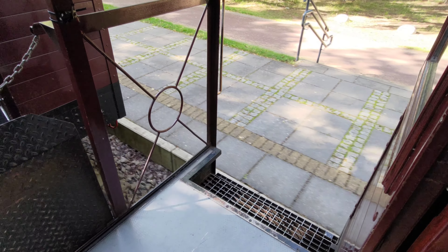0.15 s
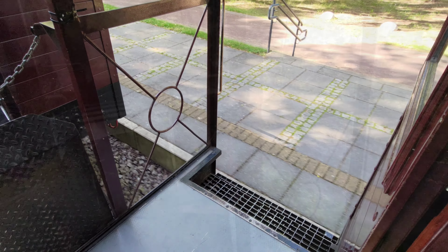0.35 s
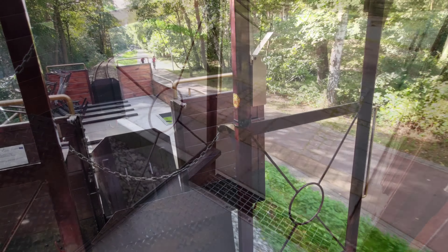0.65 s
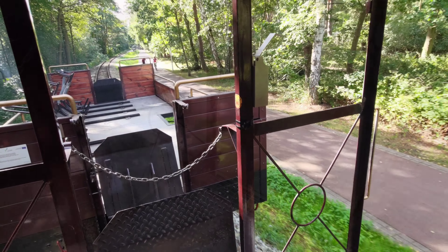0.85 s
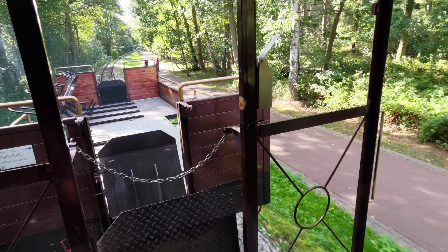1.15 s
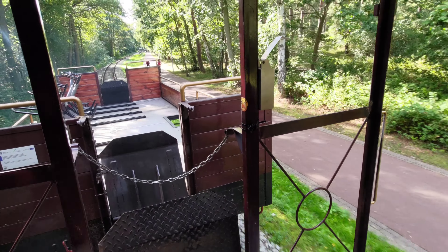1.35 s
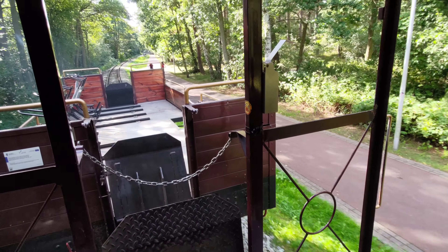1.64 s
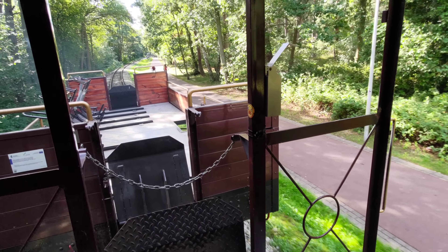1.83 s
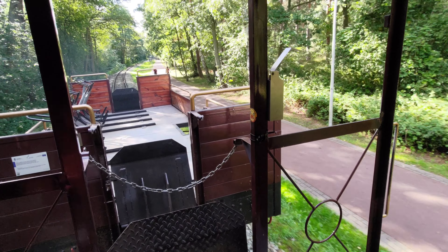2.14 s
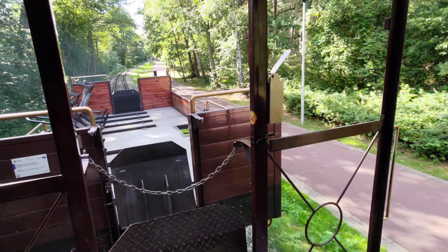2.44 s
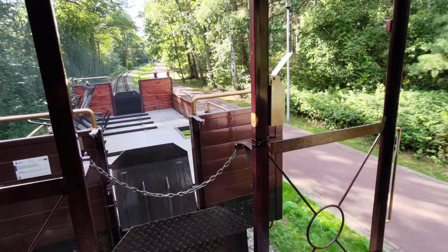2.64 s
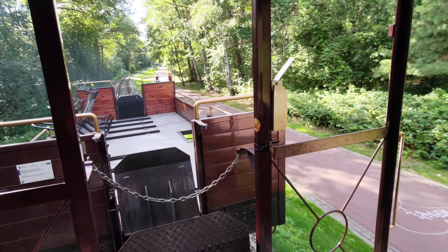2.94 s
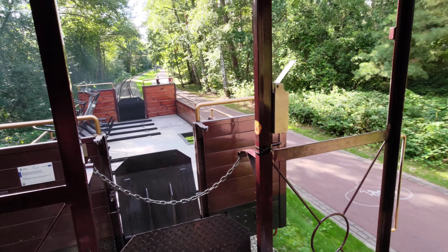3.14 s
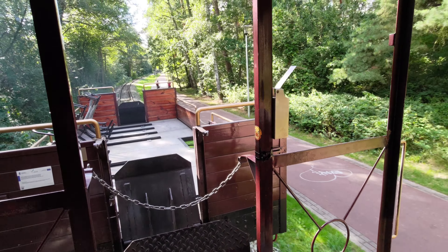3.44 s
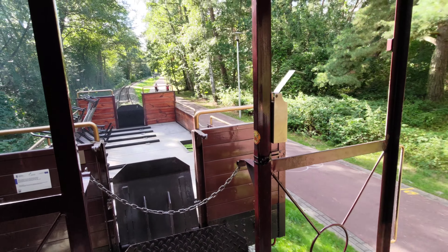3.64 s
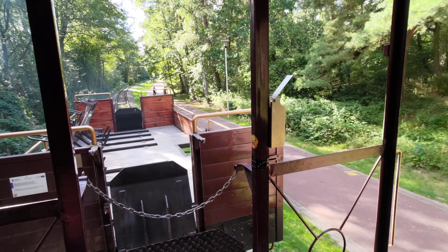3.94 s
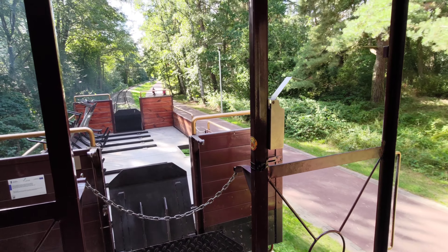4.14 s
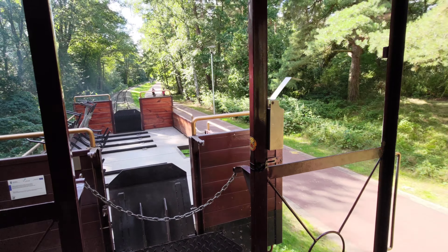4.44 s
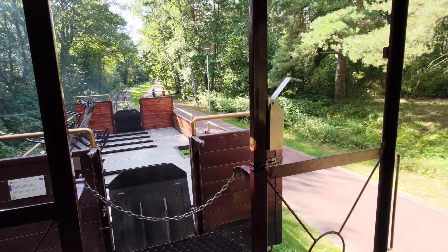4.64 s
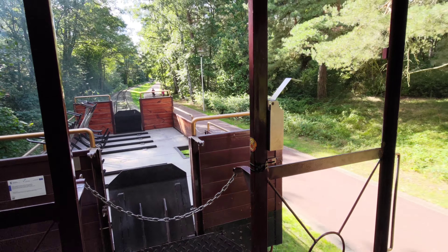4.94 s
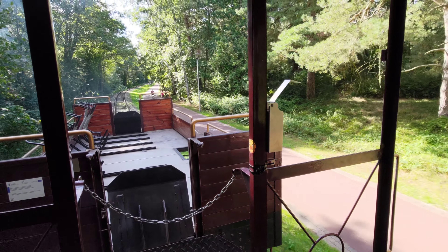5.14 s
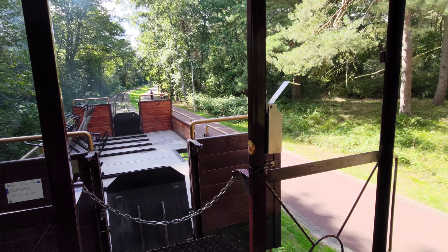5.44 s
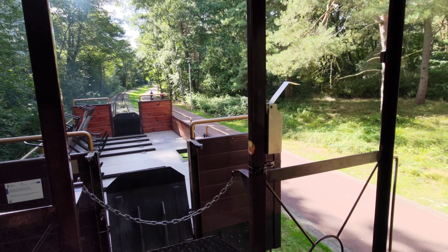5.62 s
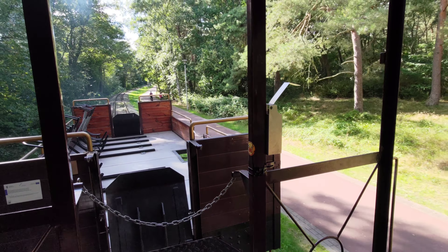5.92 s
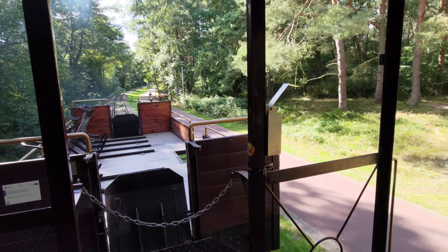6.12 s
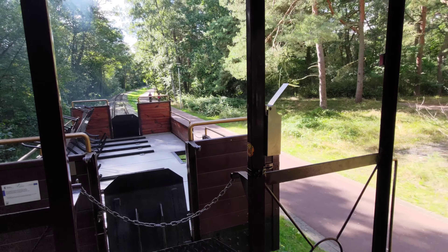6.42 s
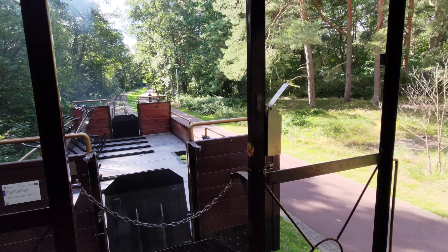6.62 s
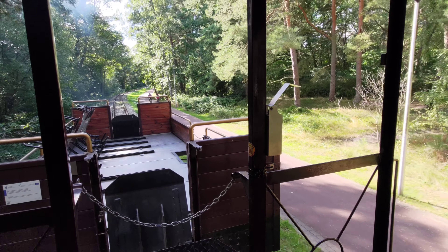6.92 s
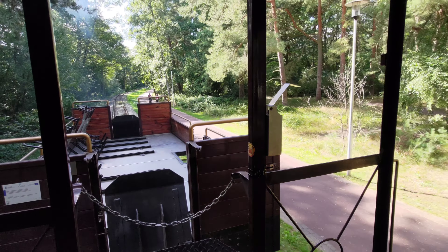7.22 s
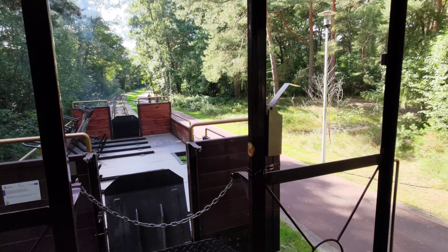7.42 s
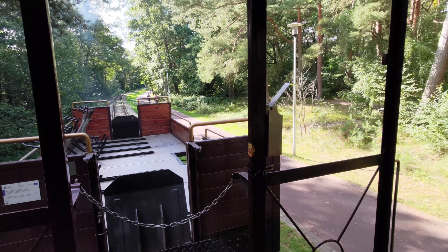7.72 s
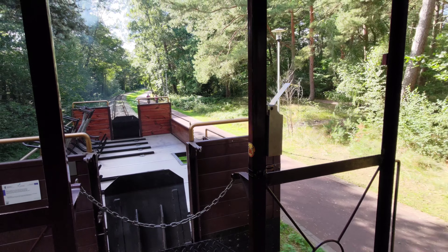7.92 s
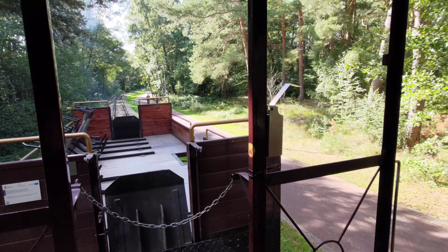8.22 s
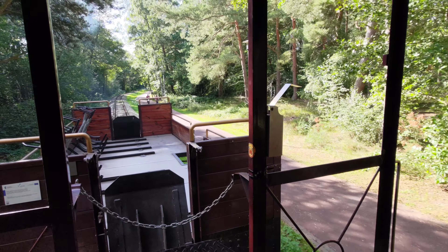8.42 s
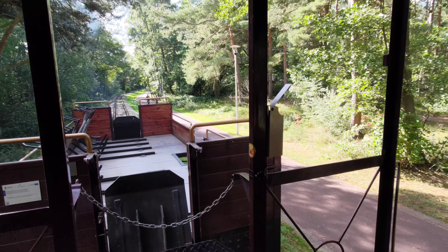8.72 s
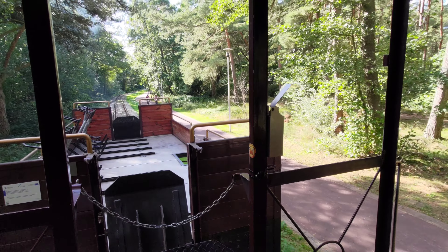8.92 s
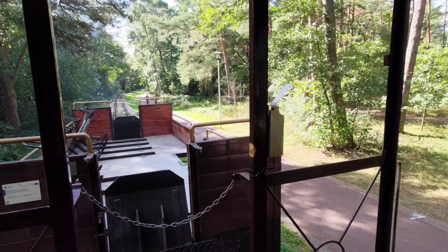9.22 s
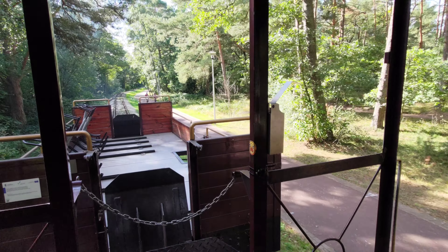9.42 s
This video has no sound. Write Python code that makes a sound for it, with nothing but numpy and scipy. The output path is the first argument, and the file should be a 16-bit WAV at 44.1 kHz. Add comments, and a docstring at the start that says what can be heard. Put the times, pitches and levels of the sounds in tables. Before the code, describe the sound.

A small open railway carriage rolls steadily with a deep boom and drumming boards, a short hiss and soft thump recurring each wheel turn.

```python
"""A low wooden boom and drumming with a ring of steel wheels: an open carriage of a small railway rolls
through woodland, heard from its platform. Shaped noise gives the body, wheels and rolling hiss. Once each
wheel turn something rubs with a short hiss of friction noise and thumps the body in a few soft cycles.
A thin squeal of two close partials sounds near the start; now and then the coupling knocks, as dying modes.
"""
import sys
import numpy as np
from scipy import signal
from scipy.io import wavfile
from scipy.ndimage import uniform_filter1d

SR = 44100
rng = np.random.default_rng(int(sys.argv[2]) if len(sys.argv) > 2 else 0)


def generate_wav(signal):
    """Clip the signal to [-1, 1] and save it as 16-bit WAV at the path in sys.argv[1]."""
    frames = np.transpose(np.atleast_2d(signal))
    scaled = np.clip(frames, -1, 1) * 32767
    pcm = np.round(scaled).astype(np.int16)
    wavfile.write(sys.argv[1], SR, pcm)


N = 421596  # length [samples]

# layer levels before the swells: (time [s], boom of the body [dB], drumming of the floor [dB],
# drumming of the side boards [dB], rolling hiss [dB], ring of the wheels [dB])
RIDE_LEVELS = [(0.0, -21.5, -27.5, -32, -41, -45), (0.2, -20, -26, -24.5, -35, -37.5),
               (0.3, -23, -36.5, -32.5, -48, -52), (0.55, -23.5, -27, -28.5, -42.5, -46),
               (1.01, -20.5, -24.5, -21.5, -40.5, -43.5), (1.97, -19, -24, -20.5, -40, -39),
               (2.61, -21, -29, -23, -43.5, -43.5), (3.3, -20, -27, -23, -43, -45.5),
               (4.1, -21.5, -27.5, -25, -44, -48.5), (4.8, -22, -23.5, -25.5, -43.5, -45),
               (5.4, -20, -26.5, -24.5, -44.5, -44.5), (6.3, -21, -25.5, -26.5, -44.5, -49),
               (7.2, -22.5, -25.5, -24, -43.5, -48.5), (8.0, -20, -25.5, -24.5, -44.5, -46),
               (8.7, -21, -25, -24.5, -44.5, -47), (9.56, -22.5, -23.5, -25, -44, -45.5)]
# swell of each of those layers once a wheel turn: (depth [dB], lag behind the rub [share of a turn])
TURN_SWELLS = [(1, 0.13), (0.5, 0.19), (1, .05), (0.3, 0.34), (1.5, 0.27)]
# the swells change as the train gathers speed: (time [s], factor on the depth [ratio])
SWELL_GROWTH = [(0, .5), (4.0, .7), (4.6, 1), (7.0, 1.36), (9.56, 1.1)]
# relative noise spectra of body, floor, side boards, rolling and rub: (frequency [Hz], density [dB per Hz])
BOOM_SPECTRUM = [(12, -45), (20, -27), (32, -15), (42, -9), (52, -4), (66, 0), (80, -3), (96, -1),
                 (125, -8), (150, -20), (400, -90)]
FLOOR_SPECTRUM = [(60, -62), (100, -29), (140, 4), (172, 10), (202, 1.5), (240, -1.5), (320, -69),
                  (900, -90)]
BOARD_SPECTRUM = [(90, -64), (170, -16.5), (235, -2), (290, -0.5), (335, -7), (500, -18), (660, -22.5),
                  (800, -29), (1000, -41), (1400, -74), (3000, -92)]
ROLL_SPECTRUM = [(500, 11.5), (900, 8.5), (1350, 9.5), (2000, 3), (2900, 0), (4200, -1.5), (6500, -7.5),
                 (7900, -10.5), (10000, -15.5), (12500, -18.5), (15600, -33)]
RUB_SPECTRUM = [(470, -29), (800, -3), (1000, -9), (1430, -5), (1700, -10), (2060, -9), (2420, -5),
                (3290, -10), (4330, -7), (6770, -13), (8680, -9), (9600, -14), (12000, -22), (14000, -25),
                (15600, -29)]
# modes of the steel wheels: (frequency [Hz])
WHEEL_MODES_HZ = [2445, 2495, 2914, 3793, 4165, 7255, 7865, 8622, 9517]
# the same modes in the same order: (width [Hz], level before division by the width [dB])
WHEEL_MODE_SHAPES = [(50.6, 15), (49.7, 10.5), (50, 4), (45, 4), (50, -4), (40, -31), (60.5, -5.5),
                     (100, -41), (50, -19)]
# likeness of the two channels: (frequency [Hz], correlation [ratio])
CHANNEL_LIKENESS = [(60, 0.99), (110, 0.99), (200, 0.97), (380, 0.92), (700, 0.61), (1290, 0.23),
                    (2380, 0.82), (4400, 0.67), (8120, 1), (15000, 0.71)]
# balance of the two channels: (frequency [Hz], left over right [dB])
CHANNEL_BALANCE = [(60, 0.0), (180, 0.5), (550, 1.0), (1650, 1), (4970, 0.5), (15000, -0.5)]
# lurches of the body, besides the thumps: (time of the crest [s], rms level at the crest [dB], note [Hz])
LURCHES = [(0.194, -17.5, 193.6), (0.267, -19, 76.6), (1.282, -18, 91.7), (1.471, -19.5, 108.5),
           (1.677, -19, 74), (1.836, -15.5, 109.7), (1.996, -21, 67.5), (2.168, -13.5, 65.7),
           (2.585, -24, 64.6), (2.919, -19, 67.3), (3.204, -19.5, 57.5), (3.388, -20, 66.4),
           (3.62, -20, 183), (3.747, -19, 66.3), (3.955, -19, 66), (4.323, -19, 67.3), (4.69, -15, 65),
           (5.07, -15.5, 63.7), (5.322, -23, 65), (5.445, -17.5, 66), (7.061, -17.5, 96),
           (9.22, -15.5, 65.6)]
# one row a wheel turn: (start of the rub [s], rise [s], hold [s], pressure [dB], extra low hiss at the
# start [dB], thump of the body [dB], thump of the floor [dB])
WHEEL_TURNS = [(0.04, 0.028, 0.025, -34.5, -1.5, -17, -29), (0.35, 0.075, 0.032, -50, 1, -29, -30),
               (0.738, 0.022, 0.096, -44.5, 3.5, -23, -32), (1.147, 0.032, 0.048, -37, 2, -17.5, -26),
               (1.543, 0.015, 0.055, -39, 2.5, -19, -26), (1.923, 0.029, 0.048, -36.5, 1, -24, -31),
               (2.306, 0.019, 0.072, -43, 5, -20, -32), (2.673, 0.076, 0.019, -36.5, 1, -16, -23.5),
               (3.067, 0.024, 0.083, -43.5, 3, -19, -25), (3.451, 0.032, 0.055, -41.5, 3.5, -17, -36),
               (3.819, 0.017, 0.067, -34.5, -0.5, -23, -21.5), (4.182, 0.052, 0.04, -42, 3.5, -16.5, -23),
               (4.565, 0.041, 0.047, -46.5, 2.5, -22, -30), (4.963, 0.011, 0.052, -50.5, 6, -29, -23.5),
               (5.299, 0.053, 0.066, -44, 3.5, -18, -24.5), (5.697, 0.01, 0.11, -53.5, 8, -14, -20),
               (6.067, 0.022, 0.066, -43.5, 3.5, -13.5, -18), (6.44, 0.021, 0.024, -38, -0.5, -15.5, -21.5),
               (6.8, 0.029, 0.051, -43, 0.5, -18, -18.5), (7.158, 0.04, 0.082, -48, 4.5, -21.5, -19.5),
               (7.534, 0.052, 0.04, -42.5, 4.5, -13.5, -20.5), (7.907, 0.02, 0.084, -45.5, 1.5, -19, -24.5),
               (8.274, 0.06, 0.016, -41.5, 2, -23, -31), (8.619, 0.044, 0.069, -47, 1.5, -21, -26.5),
               (8.993, 0.016, 0.082, -46.5, 2, -18, -29), (9.347, 0.034, 0.015, -46, 4, -17, -26)]
# short scuffs between and during the rubs: (time [s], pressure [dB], dying time t60 [s])
SHORT_SCUFFS = [(0.18, -44, 0.24), (0.316, -47.5, 0.28), (0.9234, -58, .12), (0.9941, -52, .12),
                (1.476, -48, 0.46), (2.134, -51, 0.25), (2.19, -47, 0.17), (2.488, -50, .12),
                (2.6224, -51, .12), (3.593, -40, 0.24), (3.9, -40, 0.095), (4.1225, -50, 0.13),
                (4.396, -46.5, .25), (4.7561, -52, 0.11), (4.8998, -46.5, 0.13), (5.24, -50, .12),
                (5.5294, -49, .12), (6.6722, -47, .12), (7.0479, -51, .12), (7.419, -48, .12),
                (7.698, -48, 0.53), (8.9087, -50, 0.14), (9.153, -38, 0.24)]
# a thin metal squeal: (time [s], upper partial [Hz], level [dB])
SQUEAL_TRACK = [(0.055, 10785, -57), (0.069, 10784, -48), (0.139, 10750, -41), (0.233, 10789, -69),
                (0.27, 10692, -79)]
# knocks of the coupling and softer bumps from the track: (time [s], level [dB], note of the frame [Hz],
# iron modes, relative [dB], clank, relative [dB])
COUPLING_KNOCKS = [(0.176, -14, 203, 9, -8), (1.144, -16, 182, -6, -20), (1.277, -20, 263, -6, -26),
                   (1.484, -17.5, 250, 1, -24.5), (1.61, -12, 304, -4.5, -31),
                   (1.739, -18.5, 303, 4.5, -20), (2.32, -20.5, 277, 0, -24), (3.579, -13, 240, 3.5, -21.5),
                   (3.822, -9, 268, 6, -30), (4.399, -8, 268, 0.5, -29), (4.911, -11, 235, -0.5, -32),
                   (5.083, -25.5, 245, -4, -30), (6.254, -23, 271, -6, -24), (6.828, -18, 240, -11, -27),
                   (7.949, -13.5, 173, -7, -33), (8.104, -17, 255, -16, -37), (8.205, -13.5, 297, -16, -37),
                   (8.907, -15.5, 281, -2, -30), (9.358, -14, 170, -5, -23)]
# modes of the frame: (multiple of its note [ratio], level [dB], t60 [s])
FRAME_MODES = [(.82, -5.5, 0.16), (1.0, 2.5, 0.11), (1.24, -5.5, 0.049)]
# modes of the ironwork: (frequency [Hz], level [dB], t60 [s])
IRON_MODES = [(534, -14, 0.12), (600, -15, 0.091), (666.4, -16.5, 0.16), (777, -24.5, 0.13),
              (1280, -30.5, 0.092), (2440, -26.5, 0.11)]
# small loose parts: (time [s], level [dB], frequency [Hz])
LOOSE_PARTS = [(5.69, -30, 550), (6.405, -31, 550), (6.75, -30, 550), (7.745, -42, 1300),
               (7.868, -38, 1270), (9.005, -35, 1700)]

# the contact closes, holds, lets go fast, then lingers
RISE_DB, FALL_DB_PER_S, TAIL_DB, TAIL_DB_PER_S = 16.5, 255, -15, 90
# the thumps crest after the middle of the rise
BODY_HZ, BODY_LAG_S, FLOOR_HZ, FLOOR_LAG_S = 89.14, 0.02725, 178.6, 0.056
THUD_S = 0.135
SCUFF_RISE_S, SCUFF_DULL_DB = 0.0088, 1.5
CLANK_RISE_S = 0.012
EDGE_HZ = 15720  # upper band limit


def gain_of(db):
    """Logarithmic level: decibels become an amplitude factor."""
    return 10 ** (np.asarray(db) / 20)


def evened(x):
    """Normalisation of power: the signal is scaled to rms 1."""
    return x / np.sqrt(np.mean(x ** 2) + 1e-20)


def read(points, hz):
    """Spectral interpolation: a table is read on a log-frequency axis."""
    f, value = np.transpose(points)
    return np.interp(np.log(hz + 1), np.log(f + 1), value)


def coloured(points):
    """Spectral shaping: a table becomes a gain over frequency."""
    return lambda hz: gain_of(read(points, hz))


def add(mix, s, sound):
    """Superposition: a sound is summed into the mix at time s."""
    part = mix[max(round(s * SR), 0):][:len(sound)]
    part += sound[:len(part)]


def noise(gain, size, patchy_db, patch_s, patch_hz):
    """Partial coherence: two-channel noise of rms 1 from random short-time spectra with drifting patches."""
    hop, hz = size // 4, np.fft.rfftfreq(size, 1 / SR)
    a, b, c, d, patches = rng.standard_normal((N // hop + 5, len(hz), 5)).T
    patches = uniform_filter1d(patches, max(round(patch_hz * size / SR), 1), 0)
    patches = evened(uniform_filter1d(patches, max(round(patch_s * SR / hop), 1), 1))
    # the share of mid and side sets the correlation of the channels
    angle = np.arccos(np.clip(read(CHANNEL_LIKENESS, hz), -1, 1))[:, None] / 2
    mid = (a + 1j * b) * np.cos(angle)
    side = (c + 1j * d) * np.sin(angle)
    lean = gain_of(read(CHANNEL_BALANCE, hz) / 2)[:, None]
    spectra = np.array([(mid + side) * lean, (mid - side) / lean])
    spectra = spectra * gain(hz)[:, None] * gain_of(patchy_db * patches)
    return evened(signal.istft(spectra, nperseg=size, noverlap=size - hop)[1][:, :N])


def curve(rows, axis):
    """Envelope interpolation: one dB column becomes a gain for every sample."""
    columns = np.transpose(rows)
    return gain_of(np.interp(np.arange(N) / SR, columns[0], columns[axis]))


def ride(axis):
    """Periodic amplitude modulation: one layer's slow level swells on every wheel turn."""
    depth_db, lag = TURN_SWELLS[axis - 1]
    t, starts = np.arange(N) / SR, np.transpose(WHEEL_TURNS)[0]
    next_start = 2 * starts[-1] - starts[-2]  # closes the last turn
    turns = np.interp(t, [*starts, next_start], np.arange(len(starts) + 1))
    growth = np.interp(t, *np.transpose(SWELL_GROWTH))
    swell = growth * np.cos(2 * np.pi * (turns - lag))
    return curve(RIDE_LEVELS, axis=axis) * gain_of(depth_db * swell)


def body():
    """Forced vibration: rail roughness shakes the frame, the floor and the side boards."""
    boom = noise(coloured(BOOM_SPECTRUM), size=4096, patchy_db=-0.3, patch_s=0.1, patch_hz=30)
    floor = noise(coloured(FLOOR_SPECTRUM), size=2048, patchy_db=2.0, patch_s=0.06, patch_hz=100)
    boards = noise(coloured(BOARD_SPECTRUM), size=2048, patchy_db=1.5, patch_s=0.05, patch_hz=120)
    return ride(axis=1) * boom + ride(axis=2) * floor + ride(axis=3) * boards


def modes(hz):
    """Resonance: each wheel mode answers in a peak about its own frequency."""
    power = 0
    for f, (width, db) in zip(WHEEL_MODES_HZ, WHEEL_MODE_SHAPES):
        power = power + gain_of(2 * db) / width / (1 + (2 * (hz - f) / width) ** 2) ** 0.86
    return np.sqrt(power)


def wheels():
    """Sustained resonance: the rail keeps the wheel modes ringing over the flickering hiss of rolling."""
    ring = ride(axis=5) * noise(modes, size=2048, patchy_db=3.5, patch_s=0.085, patch_hz=300)
    rolling = noise(coloured(ROLL_SPECTRUM), size=512, patchy_db=-0.5, patch_s=0.035, patch_hz=2500)
    hiss = ride(axis=4) * rolling
    flicker = gain_of(1.1 * evened(uniform_filter1d(rng.standard_normal(N), 900)))
    return ring + flicker * hiss


def thuds():
    """Short damped oscillation: each thump and lurch swells and dies as a few soft cycles."""
    rows = list(LURCHES)
    for s, rise, _, _, _, body_db, floor_db in WHEEL_TURNS:
        middle = s + rise / 2
        rows.append((middle + BODY_LAG_S, body_db, BODY_HZ))
        rows.append((middle + FLOOR_LAG_S, floor_db, FLOOR_HZ))
    out, t = np.zeros(N), np.arange(0, THUD_S, 1 / SR)
    bell = np.hanning(len(t))
    for (s, db, hz), phase in zip(rows, rng.random(len(rows))):
        cycles = np.sin(2 * np.pi * (hz * t + phase))
        add(out, s - THUD_S / 2, np.sqrt(2) * gain_of(db) * bell * cycles)
    return out


def rubbing():
    """Dry friction: contact pressure gates gritty noise, whose lower part grows when the contact is dull."""
    pressure, dull, t = np.zeros(N), np.zeros(N), np.arange(0, 0.4, 1 / SR)
    for s, rise, hold, db, dull_db, _, _ in WHEEL_TURNS:
        after = np.maximum(t - rise - hold, 0)
        release_db = np.maximum(-FALL_DB_PER_S * after, TAIL_DB - TAIL_DB_PER_S * after)
        rise_db = -RISE_DB * np.maximum(1 - t / rise, 0)
        gain = gain_of(db + rise_db + release_db) * np.minimum(t / 0.0028, 1)
        add(pressure, s, gain)
        add(dull, s, gain * gain_of(dull_db - 20.0 * t))
    for s, db, t60 in SHORT_SCUFFS:
        gain = gain_of(db - 60 * t / t60) * np.minimum(t / SCUFF_RISE_S, 1)
        add(pressure, s, gain)
        add(dull, s, gain * gain_of(SCUFF_DULL_DB))
    grit = noise(coloured(RUB_SPECTRUM), size=512, patchy_db=2.2, patch_s=0.025, patch_hz=600)
    wheel_ring = noise(modes, size=1024, patchy_db=3.5, patch_s=0.055, patch_hz=300)
    sound = grit + gain_of(-10.0) * wheel_ring  # the rub rings the wheel
    low = signal.sosfiltfilt(signal.butter(2, 4500, fs=SR, output="sos"), sound)
    high = sound - low
    ragged = gain_of(1.1 * evened(uniform_filter1d(rng.standard_normal(N), 500)))
    return ragged * (pressure * high + dull * low) / np.std(high)


def squeal():
    """Beating: two close, wavering high partials lie 55 Hz apart."""
    s, hz, db = np.transpose(SQUEAL_TRACK)
    t, out = np.arange(s[0], s[-1], 1 / SR), np.zeros(N)
    cycles = np.cumsum(np.interp(t, s, hz)) / SR
    tone = np.sin(2 * np.pi * cycles) + 0.7 * np.sin(2 * np.pi * (cycles - 55 * t))
    add(out, s[0], gain_of(np.interp(t, s, db)) * tone * signal.windows.tukey(len(t), 0.1))
    return out


def struck(table, t):
    """Free decay: modes die exponentially after one blow."""
    total = 0
    for hz, db, t60 in table:
        total = total + gain_of(db - 60 * t / t60) * np.sin(2 * np.pi * (hz * t + 0.25 * rng.random()))
    return total


def knocks():
    """Impact: a blow rings frame and ironwork, loose iron clanks as a dying rattle, and small parts clink."""
    out, t = np.zeros(N), np.arange(0, 0.3, 1 / SR)
    rise = np.minimum(t / 0.002, 1)
    rattle_band = signal.butter(4, [1300, 3300], "bandpass", fs=SR, output="sos")
    for s, db, note_hz, iron_db, clank_db in COUPLING_KNOCKS:
        frame = struck([(note_hz * factor, mode_db, t60) for factor, mode_db, t60 in FRAME_MODES], t)
        iron = gain_of(iron_db) * struck(IRON_MODES, t)
        rattle = evened(signal.sosfilt(rattle_band, rng.standard_normal(len(t))))
        clank = gain_of(clank_db - 60 * t / 0.12) * np.minimum(t / CLANK_RISE_S, 1) * rattle
        add(out, s, gain_of(db) * (frame + iron + clank) * rise)
    for s, db, hz in LOOSE_PARTS:
        clink = gain_of(db - 60 * t / 0.14) * np.sin(2 * np.pi * hz * t)
        add(out, s, clink * np.minimum(t / 0.0042, 1))
    return out


def scene():
    """Superposition: every source on the platform is summed, the knocks a little to the left."""
    placed_knocks = knocks() * gain_of([[0.4], [-0.4]])
    return body() + wheels() + thuds() + rubbing() + squeal() + placed_knocks


def record(dry):
    """Saturation and band limiting: loud crests are rounded off, then the highest treble is removed."""
    ceiling = gain_of(1)
    held = ceiling * np.tanh(dry / ceiling)
    edge = signal.firwin(2047, EDGE_HZ, window=("kaiser", 12), fs=SR)
    return signal.oaconvolve(held, edge[None], "same")


dry = scene()
out = record(dry)
generate_wav(out)
```